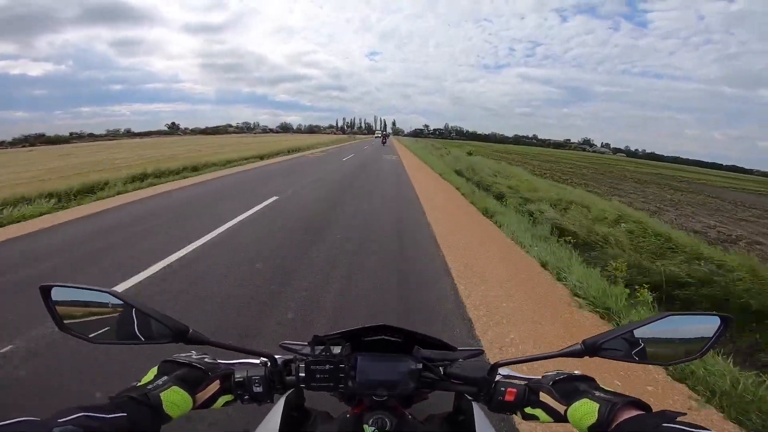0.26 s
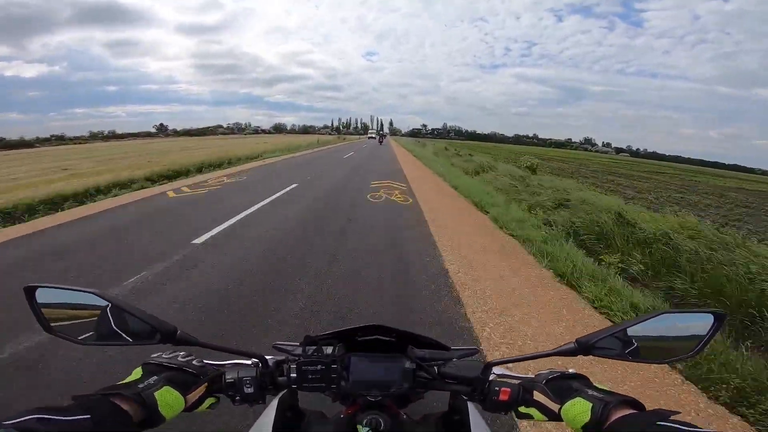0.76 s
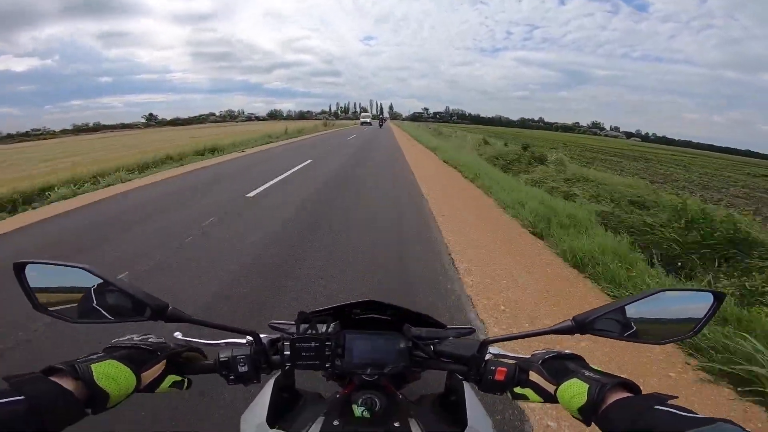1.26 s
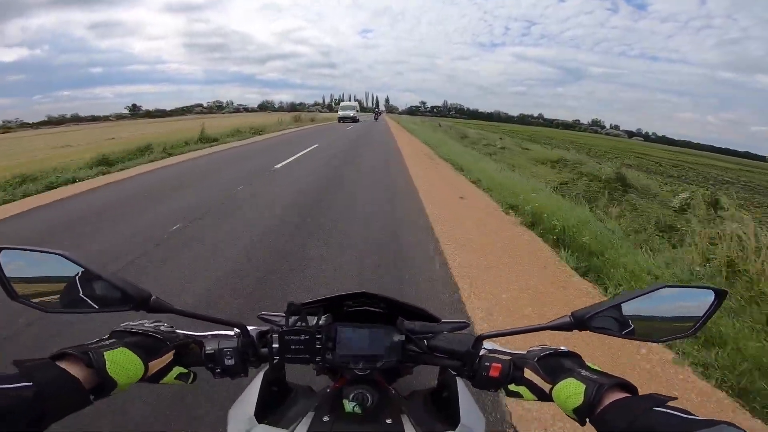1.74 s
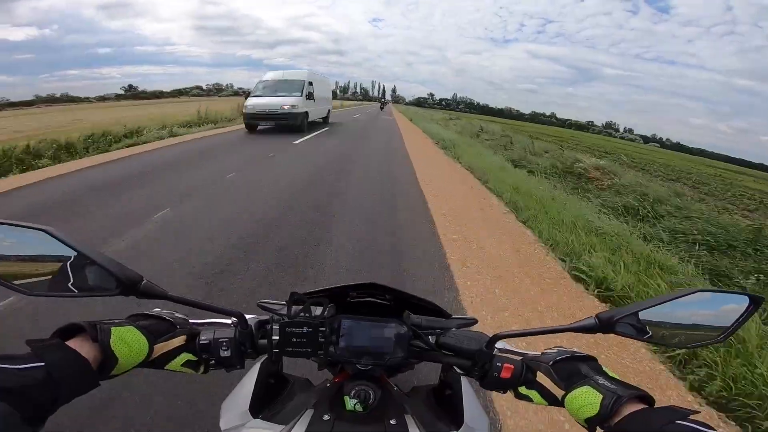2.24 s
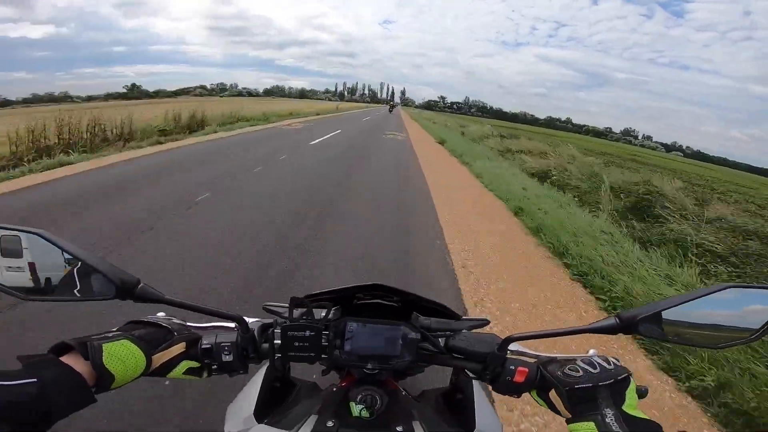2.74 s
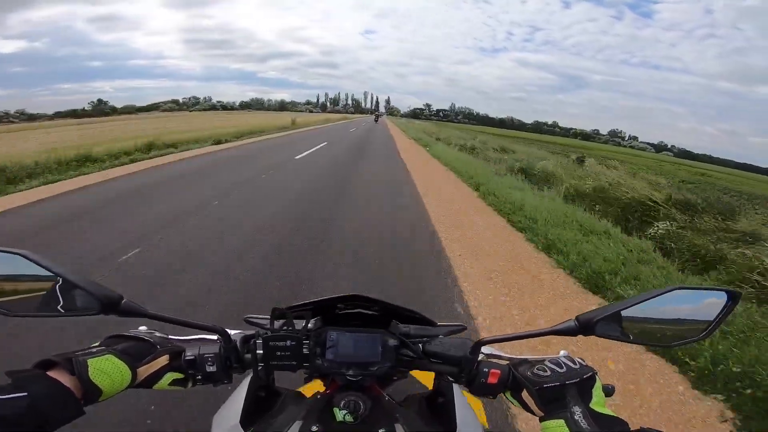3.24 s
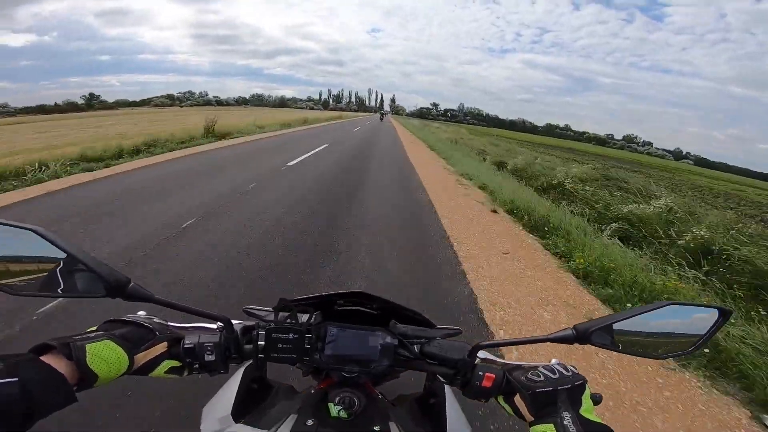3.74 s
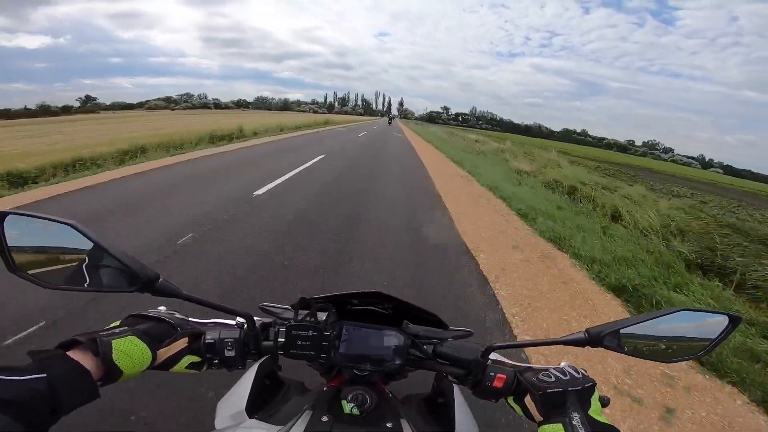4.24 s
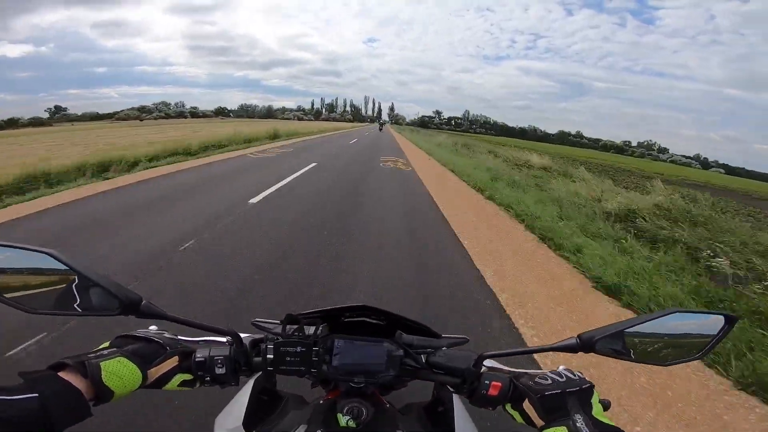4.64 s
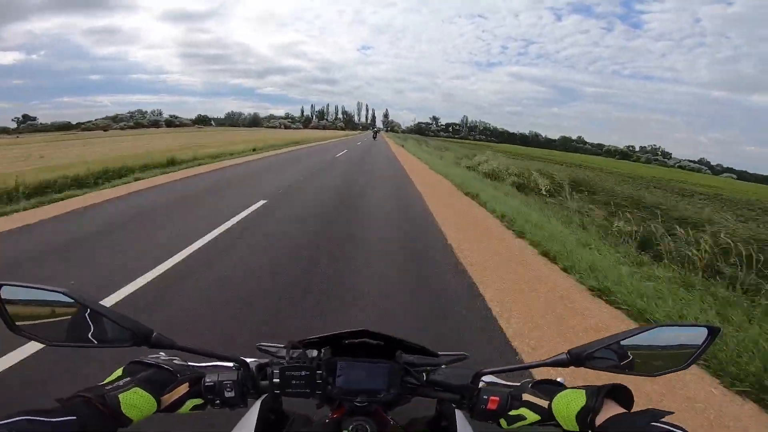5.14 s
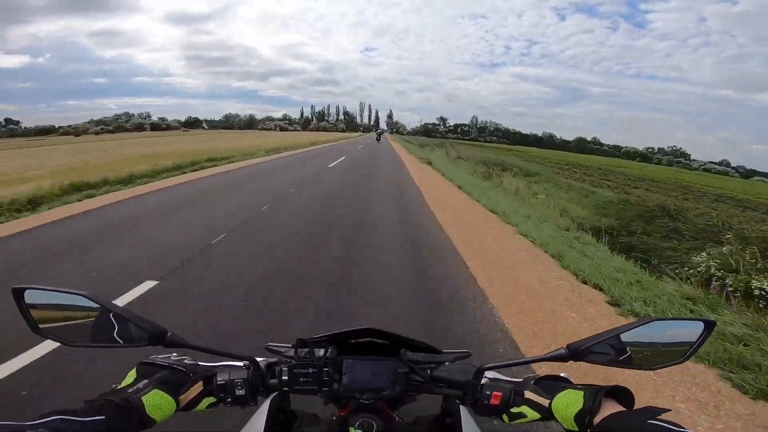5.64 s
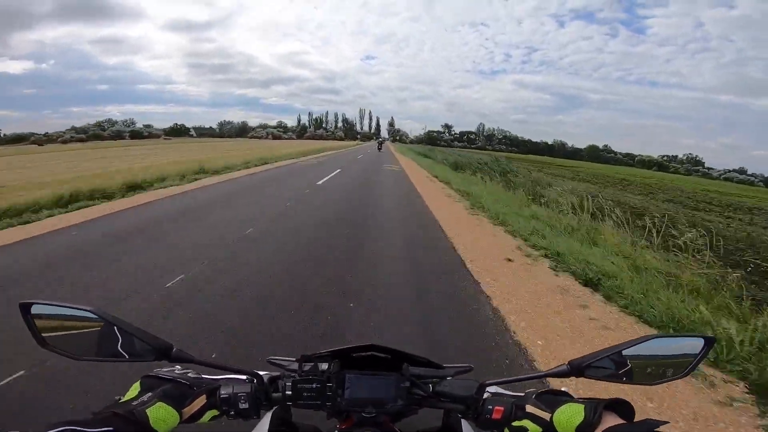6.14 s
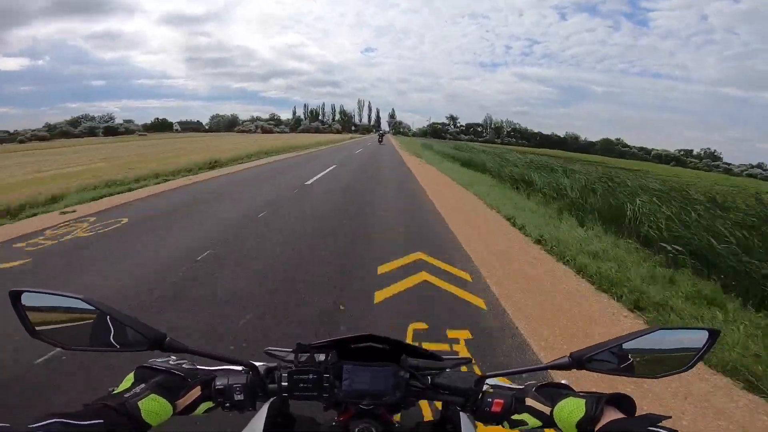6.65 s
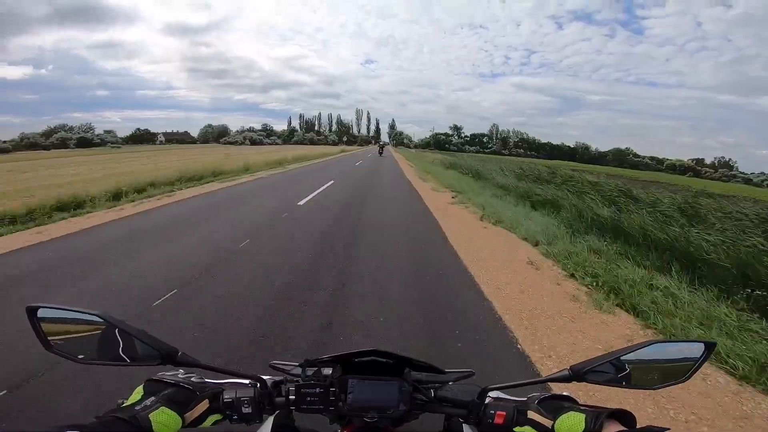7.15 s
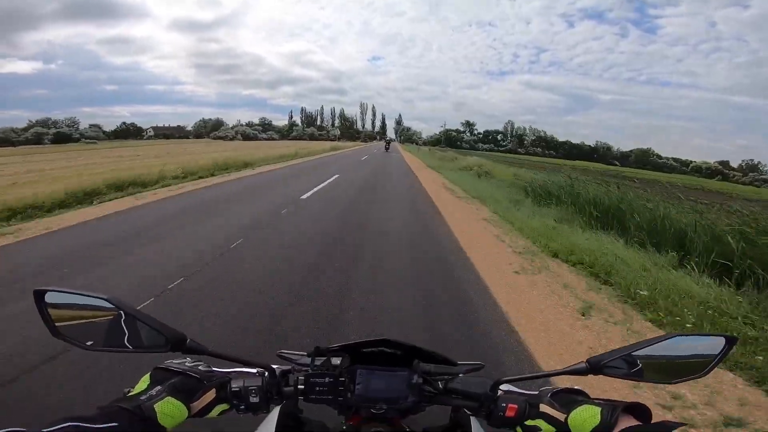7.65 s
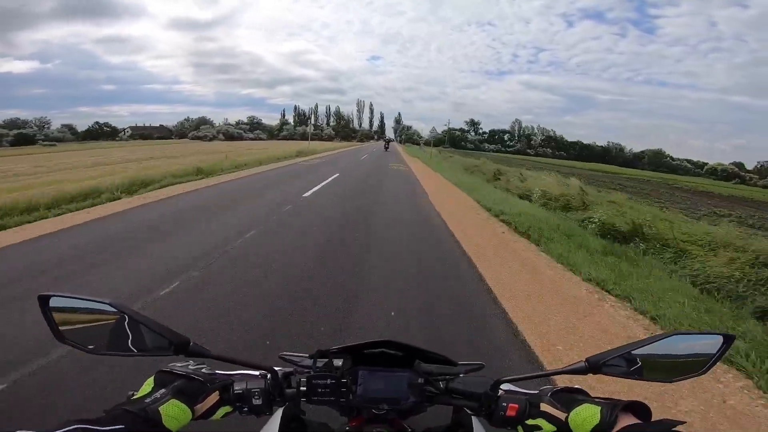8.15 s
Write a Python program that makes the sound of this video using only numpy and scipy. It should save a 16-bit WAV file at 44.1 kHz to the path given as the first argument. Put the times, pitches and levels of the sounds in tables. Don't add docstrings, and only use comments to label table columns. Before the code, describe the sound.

A motorcycle cruises with a steady drone under buffeting wind, pulls hard into a rising roar, then shuts off and slows amid heavy wind thumps.

```python
import sys
import numpy as np
from scipy import signal
from scipy.fft import rfft, irfft, next_fast_len
from scipy.io import wavfile
from scipy.ndimage import uniform_filter1d

SR = 44100
rng = np.random.default_rng(int(sys.argv[2]) if len(sys.argv) > 2 else 0)


def magnitude_from_level(level_db):
    exponent = np.asarray(level_db, float) / 20
    return 10 ** exponent


def wav_out(sig):
    wavfile.write(sys.argv[1], SR, np.round(np.clip(np.atleast_2d(sig).T, -1, 1) * 32767).astype(np.int16))


N = 369999
STEP = 16

# time in seconds, crank turns per second.
CRANK_SPEED = [(0.0, 61.46), (0.6, 63.04), (1.8, 65.44), (2.4, 66.86), (2.6, 68.5), (2.8, 70.48),
               (3.2, 74.8), (4.8, 92.4), (4.93, 93.78), (5.3, 91.02), (5.8, 86.3), (6.3, 81.16),
               (6.8, 77.36), (7.3, 74.84), (7.8, 72.02), (8.39, 69.38)]
# time in seconds, firing tone in dB, throttle in dB, drive load in dB.
ENGINE_EFFORT = [(0, -27.5, -26, -1.5), (.8, -26.5, -28.5, -0.5), (1.6, -25.5, -24.5, -1),
                 (2.45, -25.5, -30.5, 0), (2.6, -22.5, -10.5, 3), (2.7, -30, -4.5, 2),
                 (2.82, -18, 0.5, 4.5), (3.3, -18.5, 0, 3), (3.8, -17.5, -1, 3.5), (4.3, -17.5, 0.5, -1),
                 (4.89, -17.5, 1, 4), (4.94, -32, -13.5, 2), (4.99, -35, -21, -17), (5.4, -30.5, -26, -9),
                 (6.2, -37.5, -26.5, -16), (7, -25, -31.5, -4), (7.6, -29.5, -41, -11.5),
                 (8.39, -27.5, -27, -16)]
# crank order (multiple of crank speed), level in dB.
UNEVEN_ORDERS = [(2.5, 19.1), (3.0, 25.7), (3.5, 5.2), (4.0, 12.5), (4.5, 0.2), (5.0, 10.6), (5.5, -2.5),
                 (6.0, 5.7), (6.5, -1.8), (7.0, 2.7), (7.5, 1.6), (8.0, 3.6), (8.5, 0.5), (9.0, 0.5),
                 (9.5, 4), (10.0, -0.5), (10.5, 2.0), (11.0, -6.0), (11.5, -3), (12.0, -1), (12.5, -5.5),
                 (13.0, -5.7), (13.5, -9), (14.0, -6), (14.5, -12), (16.0, -4.7), (18.0, -10.0),
                 (20.0, -9.9), (22.0, -9.4), (24.0, -10.2)]
# frequency in Hz, level in dB.
PIPE_COLOUR = [(215, -66.5), (245, -47), (278, -46.5), (300, -56.5), (330, -43), (365, -37), (435, -51),
               (540, -49.5), (620, -67), (685, -56.5), (900, -46), (1050, -46), (1450, -48), (2500, -60.5)]
# centre in Hz, half width in Hz, depth in dB.
PIPE_NOTCHES = [
    (830, 28, -8.5),
    (1230, 70, -6.5),
]
GEAR_TEETH = (14, 15.08, 16.6, 22.64, 30.15, 33.2, 45.27, 51, 53, 101.9)
# crank turns per second, level in dB,
# half width in turns per second.
CASING_PEAKS = [
    [(61.7, -54.5, 2.5), (72.5, -50, 4)],
    [(62.6, -52.5, 3.3), (78, -54.5, 5), (93, -42.5, 4)],
    [(61.2, -49, 4), (69.8, -50.5, 4), (79, -47, 4.3), (90.6, -49, 5)],
    [(66, -51.5, 6), (74, -58, 1.5), (86.5, -57, 3), (89.2, -56, 2.7)],
    [(62, -68.5, 3), (73, -64.5, 5), (88, -62, 7)],
    [(70.5, -54.5, 2.9), (76.1, -57, 2.5)],
    [(91.5, -59.5, 4.5)],
    [(64.7, -63, 4.2), (73.2, -64, 2.5), (79.5, -61.5, 3), (85.5, -58.5, 2.5)],
    [(65.1, -68, 2.3), (71, -68, 1.5), (76, -65.5, 1.5), (81, -66, 1.5), (85, -68.5, 1.5)],
    [(62, -77, 3), (79.4, -76.5, 1)],
]
LASH_RAD, LASH_MOST_RAD = 0.026, 1.6

# time in seconds, strength in dB.
AIR_STRENGTH = [(0, -45), (.6, -44), (1.5, -44.5), (2.45, -43.5), (2.95, -39), (3.25, -39.5), (3.75, -39),
                (3.9, -36), (4.4, -36.5), (4.945, -35), (4.965, -37.5), (4.98, -35.5), (5.75, -35.5),
                (6.1, -37.5), (6.6, -39), (6.75, -39.5), (7.8, -40.5), (8.39, -42.5)]
CALM_DB = -40
# level in dB, dB gained per dB of airstream,
# share of a gust's shove, share of its ruffle.
WIND_REGISTERS = [
    (-26.5, 1, 0.9, 0),
    (-27, 1.34, 0.26, 1.06),
    (-40.5, 1, .05, 0.84),
    (-56, 1.21, .02, 1),
    (-79.5, 2.5, .02, 1.2),
]
# time in seconds, bass shove in dB, treble ruffle in dB.
GUST_EVENTS = [(.36, 5, 0.5), (.58, 6, 1), (1.0, 6, 1.5), (1.25, 6, 0), (1.36, -2, 2), (1.75, 7, 1),
               (2.0, 9, -1), (2.2, 6.5, 1), (2.4, 5, 0), (2.62, 3.5, 0.5), (2.97, 6, 0.5), (3.25, 2, -2),
               (3.55, 5.5, 2.5), (3.92, 2.5, -0.5), (4.28, 5.5, 0), (4.6, 3.5, 1), (5.005, 4.5, 1.5),
               (5.165, 1, -1), (5.31, 7.5, 2), (5.51, 5.5, -0.5), (5.76, 3, .5), (6.01, 5.5, -1),
               (6.2, 6.5, 1), (6.41, 3.5, 1), (6.62, 3, 1.5), (6.81, 4, -0.5), (7.03, 6, 0.5), (7.25, 9, 0),
               (7.51, 8.5, -1), (7.81, 6, 0.5)]
SHOVE_S, RUFFLE_S = 0.072, 0.043
MASKED_DB, SHAKE_DB = -3.5, 1.5
HANDOVER_HZ = (0, 130, 520, 3300, 1e6)
# frequency in Hz, density in dB per Hz.
LOW_COLOUR = [(5, -32.5), (12, -5), (22, -5), (60, 0.5), (100, -1), (150, -2.5), (220, -6), (300, -12),
              (400, -19), (520, -23.5), (800, -26.5)]
# frequency in Hz, density in dB per Hz.
RUSH_COLOUR = [(400, 13.5), (520, 0.5), (700, 0.4), (850, 0.5), (1000, 0.8), (1250, -1), (1500, -2.5),
               (1900, -8), (2300, -10), (2750, -8.5), (3100, -14.5), (3800, -21.5), (4500, -23.5)]
# frequency in Hz, density in dB per Hz.
CLATTER_COLOUR = [(400, 0.5), (520, 5.5), (700, -1.5), (850, 0), (1000, 2), (1250, 2), (1500, 1.5),
                  (1900, -6.5), (2300, -7.5), (2750, -4), (3100, -15.5), (3800, -19.5), (4500, -14.5)]
# frequency in Hz, density in dB per Hz.
HISS_COLOUR = [(2750, 9), (3100, 4), (3800, 0.5), (4500, -2), (6000, -7.5), (8700, -14), (9800, -13.5),
               (11000, -18.5), (14000, -26.5), (15500, -27), (16500, -30)]

# time in seconds, peak in dB, width in seconds.
SUCTION_THUMPS = [(1.0218, -14.9, 0.0029), (1.0523, -13.9, 0.0032), (2.1591, -12.2, 0.0036),
                  (2.3915, -12.3, 0.003), (5.012, -8.2, 0.0037), (5.1022, -7.4, 0.0029),
                  (5.1886, -8.5, 0.0022), (5.2872, -6.0, 0.0021), (5.3222, -6.8, 0.0029),
                  (5.4055, -7.4, 0.0025), (5.4892, -7.3, 0.0023), (5.7399, -3.3, 0.0019),
                  (5.7783, -8.6, 0.0033), (5.8734, -7.8, 0.0022), (5.9964, -9.2, 0.0022),
                  (6.2069, -7.0, 0.0023), (6.4399, -12.8, 0.0015), (6.6019, -11.4, 0.0026),
                  (6.7749, -10.4, 0.0023), (6.9911, -8.3, 0.002), (7.0553, -10.7, 0.0032),
                  (7.2471, -10.1, 0.0015), (7.8251, -11.8, 0.004), (8.0615, -14.4, 0.0026),
                  (8.1614, -13.7, 0.0033)]
# start in seconds, length in seconds, level in dB.
INSECT_BUZZES = [
    (1.446, 0.076, -77),
    (1.497, .25, -82),
    (1.72, .07, -76),
    (1.875, .07, -78),
    (2.0, .07, -80),
]
# start in seconds, length in seconds, start in Hz, end in Hz, level in dB.
BIRD_CALLS = [
    (6.453, 0.065, 4800, 4950, -59),
    (6.59, .09, 5100, 4600, -56),
    (6.658, 0.091, 4650, 4500, -60),
    (7.1, .1, 4550, 4380, -66),
    (7.6, .08, 4600, 4500, -63),
    (7.993, 0.089, 4500, 4280, -65),
]
INSECT_HZ, INSECT_WAVER_HZ, BIRD_WAVER_HZ = 14100, 450, 140
# start in seconds, stop in seconds, pitch in Hz, level in dB.
BRAKE_WHISTLE = (5.04, 6.46, 14315, -83)


def unit(x):
    return x / np.sqrt(np.mean(x ** 2) + 1e-20)


def along(points, hz):
    f, v = np.transpose(points)
    return np.interp(np.log(hz + 1), np.log(f + 1), v)


def curves(rows):
    s, *columns = np.transpose(rows)
    t = np.arange(N) / SR
    return [np.interp(t, s, column) for column in columns]


def wobble(rate, size=1):
    knots = rng.standard_normal(int(N / SR * 2 * rate) + 4)
    return np.interp(np.arange(0, N, size) * rate / SR, np.arange(len(knots)), knots)


def partial(level_db, phase):
    level = np.repeat(magnitude_from_level(level_db), STEP)[:N]
    return np.sqrt(2) * level * np.sin(np.float32(phase % (2 * np.pi)))


def pipe_db(hz):
    colour_db = along(PIPE_COLOUR, hz)
    for centre_hz, width_hz, db in PIPE_NOTCHES:
        colour_db = colour_db + db * np.exp(-((hz - centre_hz) / width_hz) ** 2)
    return colour_db


def exhaust(turns, angle):
    firing_db, throttle_db, _ = curves(ENGINE_EFFORT)
    throttle = magnitude_from_level(throttle_db)
    octave = (magnitude_from_level(-22) + 1.2 * throttle) * (1 - throttle)
    drone = np.sin(2 * angle) + octave * np.sin(4 * angle)
    sound = np.sqrt(2) * magnitude_from_level(firing_db + 0.65 * wobble(6.4)) * drone
    flutter = [wobble(4.5, size=STEP) for _ in range(7)]
    for k, (order, db) in enumerate(UNEVEN_ORDERS):
        flare_db = (0.3 + 1.5 * (order % 1 == 0) + 2.0 * flutter[k % 7]) * (order > 7.7)
        level_db = db + pipe_db(order * turns[::STEP]) + throttle_db[::STEP] + flare_db
        sound += partial(level_db, order * angle + rng.uniform(0, 2 * np.pi))
    return sound


def gears(turns, angle):
    load_db = curves(ENGINE_EFFORT)[2][::STEP]
    lash = wobble(30)
    sound = np.zeros(N)
    for teeth, peaks in zip(GEAR_TEETH, CASING_PEAKS):
        casing = 0
        for speed, db, width in peaks:
            casing = casing + magnitude_from_level(db) / (1 + ((turns[::STEP] - speed) / width) ** 2) ** 2
        level_db = 20 * np.log10(casing) + load_db + 1.4 * wobble(8, size=STEP)
        wander = min(LASH_RAD * teeth, LASH_MOST_RAD) * lash
        sound += partial(level_db, teeth * angle + wander)
    return sound


def airstream():
    t = np.arange(0, N, STEP) / SR
    s, shove_db, ruffle_db = np.transpose(GUST_EVENTS)

    def swell(db, half_s):
        bumps = np.exp(-((t[:, None] - s) / half_s) ** 2)
        return np.repeat(bumps @ db, STEP)[:N]

    shove, ruffle = swell(shove_db, SHOVE_S), swell(ruffle_db, RUFFLE_S)
    flow_db = curves(AIR_STRENGTH)[0] - CALM_DB
    return [db + grows * flow_db + shoved * shove + ruffled * ruffle
            for db, grows, shoved, ruffled in WIND_REGISTERS]


def coloured(spectrum, gain, order):
    m = next_fast_len(N + 8192)
    hz = np.fft.rfftfreq(m, 1 / SR) + 1

    def below(edge_hz):
        return edge_hz ** 12 / (edge_hz ** 12 + hz ** 12)

    band = np.sqrt(below(HANDOVER_HZ[order + 1]) - below(HANDOVER_HZ[order]))
    colour = magnitude_from_level(along(spectrum, hz)) * band
    noise = gain * rng.standard_normal(N)
    return unit(irfft(rfft(noise, m) * colour, m)[:N])


def wind():
    buffet_db, roar_db, rush_db, hiss_db, sizzle_db = airstream()
    engine = np.clip(magnitude_from_level(curves(ENGINE_EFFORT)[1]), 0, 1)
    eddy, gust = wobble(25), wobble(12)

    buffet = magnitude_from_level(buffet_db + SHAKE_DB * engine) * coloured(LOW_COLOUR, magnitude_from_level(0.71 * eddy), order=0)
    roar_gain = magnitude_from_level(1.5 * eddy + 1.2 * wobble(45))
    roar = magnitude_from_level(roar_db + MASKED_DB * engine) * coloured(LOW_COLOUR, roar_gain, order=1)

    ruffle = magnitude_from_level(0.35 * eddy + 0.5 * gust + 0.79 * wobble(60))
    rush = np.sqrt(1 - engine) * coloured(RUSH_COLOUR, ruffle, order=2)
    rush += np.sqrt(engine) * coloured(CLATTER_COLOUR, ruffle, order=2)

    hiss_gain = magnitude_from_level(0.31 * eddy + 0.53 * gust + 0.97 * wobble(50))
    hiss = magnitude_from_level(hiss_db) * coloured(HISS_COLOUR, hiss_gain, order=3)
    sizzle = coloured([(6000, -17), (10000, -1.5), (16000, -9)], ruffle, order=3)
    hiss += (magnitude_from_level(hiss_db - 19.5) * engine + magnitude_from_level(sizzle_db)) * sizzle
    return buffet + roar + magnitude_from_level(rush_db) * rush + hiss


def thumps():
    sound = np.zeros(N)
    t = np.arange(-600, 600) / SR
    for s, db, width in SUCTION_THUMPS:
        u = t / width
        pulse = magnitude_from_level(db - 3.5) * (1 - 2 * u ** 2) * np.exp(-u ** 2)
        sound[round(s * SR) - 600:][:len(t)] -= pulse
    return sound


def chirp(length, start_hz, end_hz, db, waver_hz):
    n = round(length * SR)
    waver = uniform_filter1d(rng.standard_normal(SR // 4), size=40)[:n]
    hz = np.linspace(start_hz, end_hz, n) + waver_hz * unit(waver)
    return magnitude_from_level(db + 4.5) * np.hanning(n) ** 0.5 * np.sin(2 * np.pi * np.cumsum(hz) / SR)


def roadside():
    sound = np.zeros(N)
    calls = [(s, length, INSECT_HZ, INSECT_HZ, db, INSECT_WAVER_HZ) for s, length, db in INSECT_BUZZES]
    calls += [(*call, BIRD_WAVER_HZ) for call in BIRD_CALLS]
    for s, *call in calls:
        one = chirp(*call)
        sound[round(s * SR):][:len(one)] += one
    return sound


def brake():
    start, stop, hz, db = BRAKE_WHISTLE
    t = np.arange(N) / SR
    drag = np.clip(np.minimum(t - start, stop - t) / 0.05, 0, 1)
    tone = np.sin(2 * np.pi * hz * t + 1.5 * wobble(60))
    return drag * magnitude_from_level(db + 3.5 * wobble(12)) * tone


def scene():
    turns = curves(CRANK_SPEED)[0]
    angle = 2 * np.pi * np.cumsum(turns) / SR
    machine = exhaust(turns, angle) + gears(turns, angle)
    mono = machine + wind() + thumps() + roadside() + brake()
    return np.array([mono, mono])


def roll_off(x):
    return signal.sosfilt(signal.butter(12, 15680, fs=SR, output="sos"), x)


def record(dry):
    bass = signal.sosfiltfilt(signal.butter(8, 330, fs=SR, output="sos"), dry[0])
    lean = magnitude_from_level(-32.4) * bass
    return roll_off(dry + np.array([-lean, lean]))


dry = scene()
out = record(dry)
wav_out(out)
```